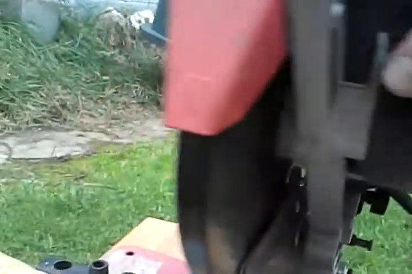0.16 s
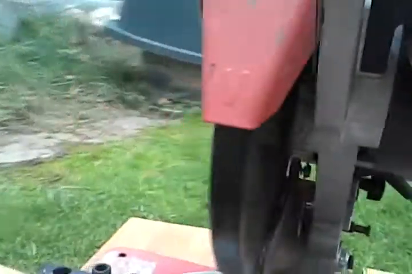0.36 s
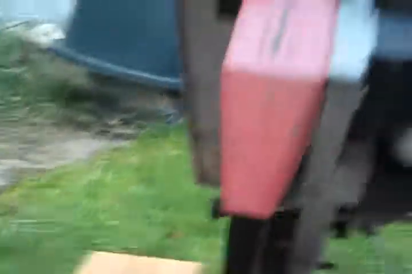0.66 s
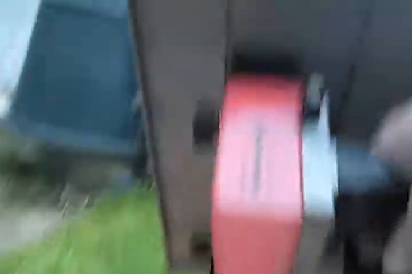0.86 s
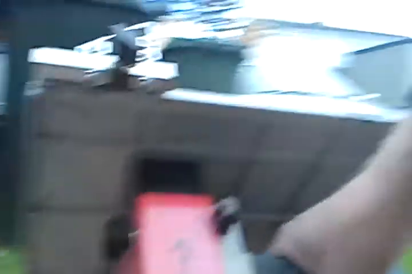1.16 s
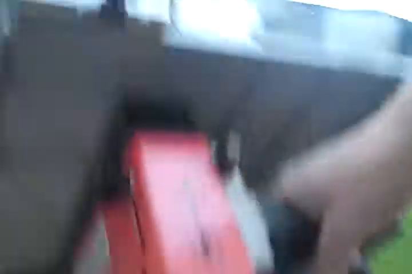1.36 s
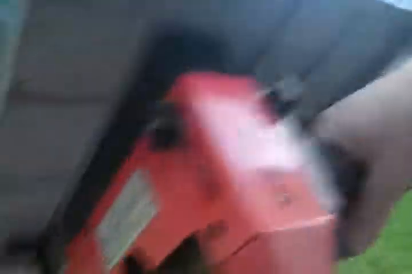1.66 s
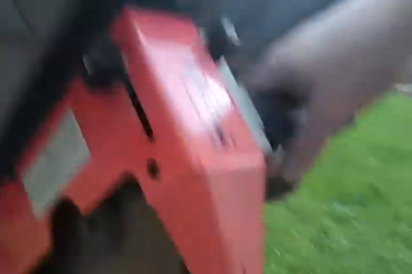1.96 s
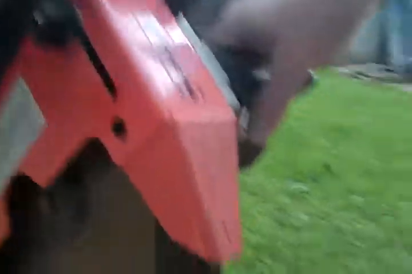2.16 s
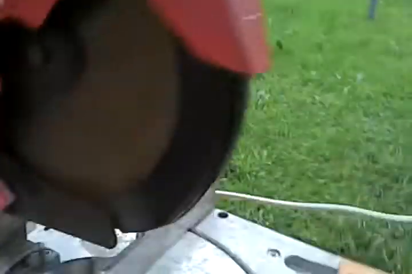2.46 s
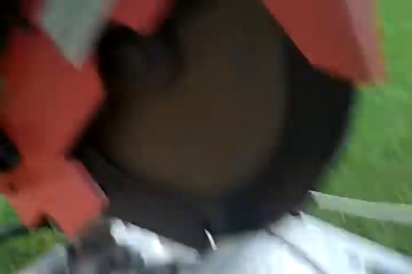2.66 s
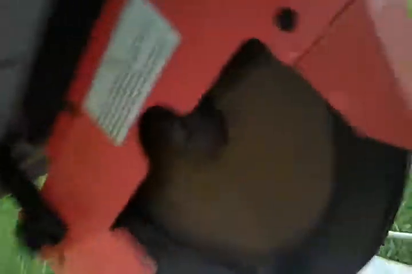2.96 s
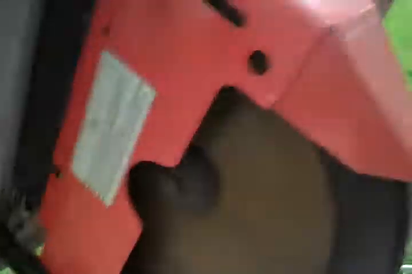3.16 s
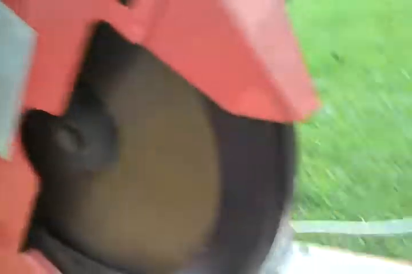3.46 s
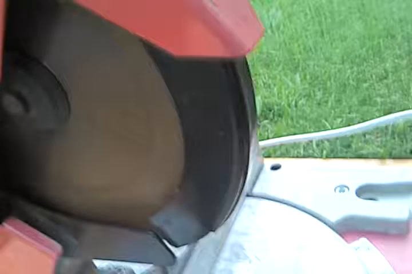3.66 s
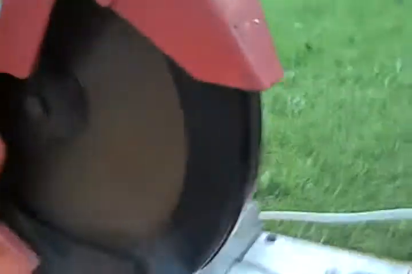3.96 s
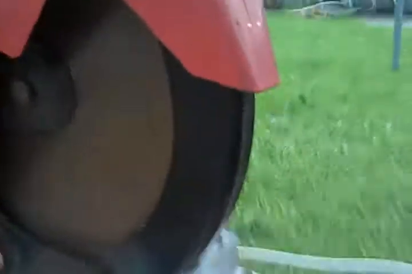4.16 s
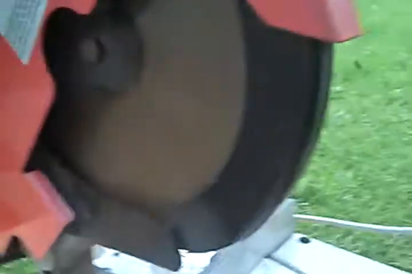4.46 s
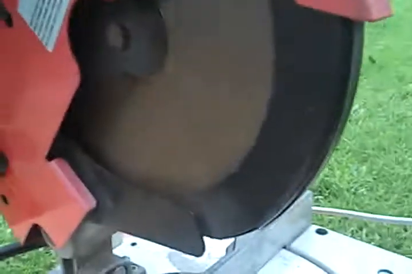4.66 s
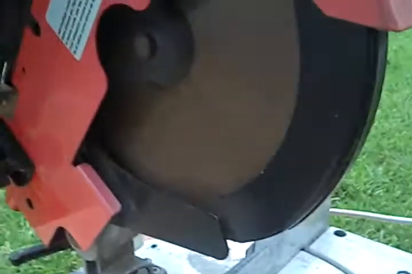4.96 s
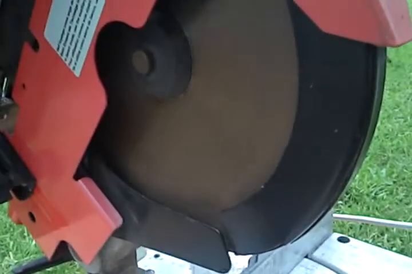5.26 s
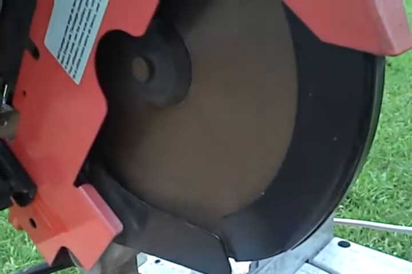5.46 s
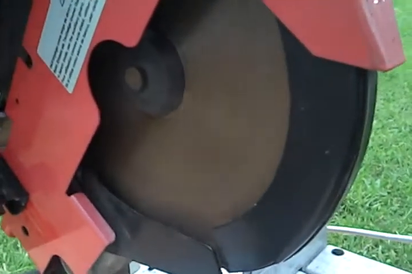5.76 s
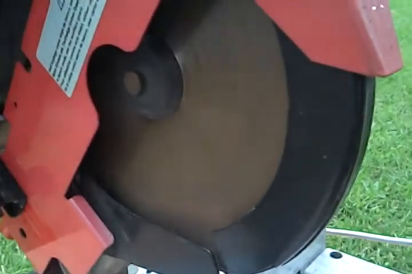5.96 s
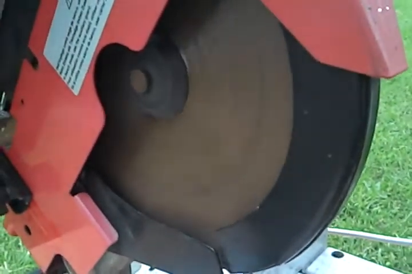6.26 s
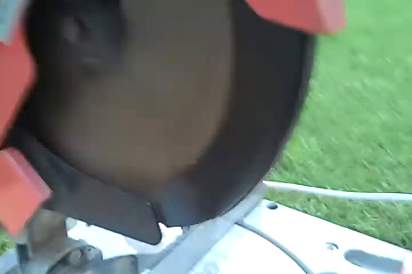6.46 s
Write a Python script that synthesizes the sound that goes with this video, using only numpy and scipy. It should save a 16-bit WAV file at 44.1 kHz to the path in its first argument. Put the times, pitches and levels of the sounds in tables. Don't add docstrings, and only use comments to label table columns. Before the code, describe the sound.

Close outdoor stereo sound of a saw coasting after switch-off. It begins loud, with a bright, gritty metallic clatter pulsing over twenty times a second, mixed with airy fan noise and descending gear and motor tones. The movement around it changes the colour and favours the right side. The pulsing flattens and slows, the pitch slides down, the rattle dies, and lumpy wind rumbles mostly on the left.

```python
import sys
import numpy as np
from scipy import signal
from scipy.fft import rfft, irfft, next_fast_len
from scipy.io import wavfile
from scipy.ndimage import uniform_filter1d

SR = 44100
rng = np.random.default_rng(int(sys.argv[2]) if len(sys.argv) > 2 else 0)


def voltage_ratio(decibels):
    exponent = np.asarray(decibels, float) / 20
    return 10 ** exponent


def unload_audio(sound):
    columns = np.transpose(np.atleast_2d(sound))
    steps = np.round(np.clip(columns, -1, 1) * 32767)
    wavfile.write(sys.argv[1], SR, steps.astype(np.int16))


N = 291060
PAD = next_fast_len(N + 8192)
FREQ = np.arange(PAD // 2 + 1) * SR / PAD + 1e-3
TIME = np.arange(N) / SR


def curves(table):
    seconds, *columns = np.transpose(table)
    return [np.interp(TIME, seconds, column) for column in columns]


def colour(points):
    hz, db = np.transpose(points)
    return voltage_ratio(np.interp(np.log(FREQ), np.log(hz), db))


def unit(gain, band):
    shaped = gain * band
    return shaped / np.sqrt(np.mean(np.abs(shaped) ** 2))


def walk(rate):
    hold = max(int(SR / rate), 1)
    steps = np.repeat(rng.standard_normal(N // hold + 1), hold)
    return 1.36 * uniform_filter1d(uniform_filter1d(steps, hold), hold)[:N]


def late(x, ms):
    lag = np.round(ms * SR / 1000).astype(int)
    return x[np.clip(np.arange(N) - lag, 0, N - 1)]


def causal(gain):
    cepstrum = irfft(np.log(gain), PAD)
    cepstrum[1:PAD // 2] *= 2
    cepstrum[PAD // 2 + 1:] = 0
    return np.exp(1j * rfft(cepstrum).imag)


# time in seconds, gear teeth meeting per second in Hz.
COASTING = [(0, 1112), (1, 933), (2, 762), (3, 605), (4, 453), (5, 309), (6, 155), (6.6, 83)]
# time in seconds, lead in wheel turns.
WALK_ROUND = [(0, -.02), (.15, .16), (.5, .06), (1.05, -.03), (1.22, -.25), (1.4, -.23), (1.7, .08),
              (2.1, .08), (3.8, -.3)]


def turn():
    teeth_per_turn, start_turns = 41.5, 0.28
    teeth = np.cumsum(curves(COASTING)[0]) / SR
    return (teeth / teeth_per_turn + curves(WALK_ROUND)[0] + start_turns) % 1


# pitch in Hz, width in Hz, level in dB.
BODY_RINGS = [
    [(583, 143, -2), (1003, 22, -5), (1985, 26, -3.5), (2380, 44, -18), (3160, 210, -6), (4300, 120, 1.5),
     (4840, 550, -0.5), (6100, 68, -22), (6493, 110, -5.5), (7760, 204, -15), (8800, 154, -27)],
    [(910, 140, -8), (2415, 49, 8), (3400, 435, -1), (3300, 14.5, -1), (3590, 35, 4.5), (4680, 110, -11),
     (5830, 14, -12), (6530, 40, 0), (7100, 110, -13), (6930, 43, 3), (7500, 110, -5), (8420, 88, -8)],
    [(591, 88, -8), (968, 34, -8), (1870, 35, -60), (2558, 48, 2.5), (3500, 30, -1.5), (4070, 46, -6),
     (4400, 30, -23), (4724, 64, -3.5), (6670, 64, -5.5), (7380, 70, -9), (8010, 330, -14),
     (8900, 120, -14)],
]
# frequency in Hz, level in dB per Hz.
BODY_BROAD = [
    [(150, -59), (250, -23), (795, -41), (995, -6.5), (1640, -8), (2480, -4), (2750, -12), (4950, -2),
     (5880, -10.5), (11100, -19), (15500, -18)],
    [(150, -60), (250, -9.5), (1310, -2), (1530, -15), (2090, 2), (3110, 2), (3890, -17), (4700, 12.5),
     (5130, 1.5), (7620, -15), (15500, -21)],
    [(150, -58), (250, -56), (961, -2.5), (1080, -13), (1760, -2), (4170, -10.5), (4870, 2), (7760, -25.5),
     (10200, -19.5), (14700, -21.5), (15500, -55)],
]
RING_OVER_BROAD_DB = [4.5, 4.5, 8.5]


def body(view, shade_hz=30000):
    rings = 0
    for hz, width, db in BODY_RINGS[view]:
        rings = rings + voltage_ratio(db) ** 2 / (1 + ((FREQ - hz * hz / FREQ) / width) ** 2)
    rings = rings / (1 + (FREQ / shade_hz) ** 8)
    return np.sqrt(rings * voltage_ratio(RING_OVER_BROAD_DB[view]) ** 2 + colour(BODY_BROAD[view]) ** 2)


# frequency in Hz, level in dB.
LEFT_SHADE = [
    [(60, 0.5), (110, -1.0), (200, -3), (380, -3), (700, -2.5), (1290, -3), (2380, 22.5), (4400, -14),
     (8120, -24), (15000, -26)],
    [(60, -1.5), (110, -3.5), (200, -19), (380, 1), (700, 1.5), (1290, -6), (2380, -24), (4400, -9),
     (8120, 12), (15000, 13)],
    [(60, 0.0), (110, -2.0), (200, -19), (380, 4), (700, 2.5), (1290, 9.5), (2380, -1.5), (4400, -19.5),
     (8120, -10), (15000, -22.5)],
]
# time in seconds, gear rattle at the right microphone in dB, wrist turn toward the left one in dB.
GEAR_AND_WRIST = [(0, -8.5, 0.5), (.17, -13.5, 0.5), (.7, -17, 1.5), (1.05, -20, 1), (1.36, -19, 2.5),
                  (1.63, -13, 1.5), (2.04, -14, 1.5), (2.38, -15.5, 1.5), (2.7, -13, 1.5),
                  (3.06, -13.5, 3.5), (3.3, -15.5, 1), (3.9, -17.5, 4.5), (4.7, -20, -0.5), (5.1, -24, 2.5),
                  (5.6, -27.5, 3), (5.95, -35, 4.5), (6.4, -44, 6), (6.6, -50.5, 5.5)]
# time in seconds, viewpoint (0 motor end, 1 top, 2 wheel side), throb depth in dB, left lag in ms.
VIEWPOINT = [(0, 0.023, 15, 0.11), (.5, 0.14, 15.6, 0.09), (1.0, 0.37, 13, 0.16), (1.5, 0.77, 14, 0.19),
             (1.7, 1.03, 9.3, 0.2), (2.2, 1.49, 7.6, 0.29), (2.6, 1.61, 3.9, 0.34), (3.1, 1.76, 5.6, 0.33),
             (3.4, 2.02, 2.6, 0.35), (4.5, 1.66, 1, 0.28), (6.6, 1.76, 0.81, 0.25)]
# low edge in Hz, high edge in Hz, share of the throb, likeness of the two
# microphones from 0 to 1, share of the lag, graininess in dB, flicker in dB, level in dB.
SAW_PARTS = [
    (3530, 8060, 1.11, 0, 0.94, 1.33, 0.97, 0.84),
    (325, 1280, 0.15, 0.77, 0.6, -0.07, 1, 0.1),
    (1516, 3250, 0.63, 0.39, 0.96, 1.5, 1.24, 0.59),
    (7260, 16500, 0.098, 0, 0.98, -0.1, 0.63, 3),
]
# levels in dB at the three viewpoints, share of the rattle followed, dB per kHz of tooth pitch.
PART_LEVELS = [
    ([0, 0, 0], 1, 0),
    ([-14, -21, -20], .51, 0.72),
    ([6.4, 0.92, 0.1], 0.86, -9.5),
    ([-45.5, -37.5, -34], 0.46, 26.8),
]
# left minus right in dB at the three viewpoints, share of the wrist turn.
PART_SIDES = [
    ([-8.5, -12, -9.5], 0.1),
    ([0.82, -3.5, -2.3], 0.45),
    ([-3.5, -7.5, -4.25], 1.6),
    ([-5, -26, -5], 0.16),
]


def rattle():
    rise_turns, arc_turns = 0.23, 0.71
    gear_db, wrist_db = curves(GEAR_AND_WRIST)
    view, depth_db, lag_ms = curves(VIEWPOINT)
    mesh_khz = curves(COASTING)[0] / 1000
    angle = turn()
    bite = np.clip(angle / rise_turns, 0, 1)
    easing = np.cos(np.pi / 2 * np.clip(angle / arc_turns, 0, 1)) ** 2
    throb = bite * easing
    bodies = [body(v) for v in range(3)]
    shaded = [body(v, shade_hz=5300) * colour(LEFT_SHADE[v]) for v in range(3)]
    left = right = 0
    for part, (seen_db, follow, slope), (side_db, wrist_share) in zip(SAW_PARTS, PART_LEVELS, PART_SIDES):
        low_hz, high_hz, share, alike, lag, grain_db, flicker_db, part_db = part
        level_db = np.interp(view, range(3), seen_db) + follow * gear_db + slope * mesh_khz
        pan_db = np.interp(view, range(3), side_db) + wrist_share * wrist_db
        band = 1 / np.sqrt((1 + (low_hz / FREQ) ** 12) * (1 + (FREQ / high_hz) ** 12))
        throb_db = share * depth_db * throb * (1 + 0.14 * walk(24.96))
        push = voltage_ratio(throb_db + grain_db * walk(300) + flicker_db * walk(21.956))
        push = push / np.sqrt(uniform_filter1d(push ** 2, SR // 5)) * voltage_ratio(level_db + part_db)
        near, other = rng.standard_normal((2, N))
        other = other - 0.67 * uniform_filter1d(other, size=11)
        far = np.sqrt(alike) * late(near, lag * lag_ms) + np.sqrt(1 - alike) * other
        far = far * voltage_ratio(pan_db)
        for v in range(3):
            facing = np.clip(1 - np.abs(view - v), 0, 1) * push
            right = right + rfft(near * facing, PAD) * unit(bodies[v], band)
            left = left + rfft(far * facing, PAD) * unit(shaded[v], band)
    return irfft(np.array([left, right]) * causal(sum(bodies)), PAD)[:, :N]


def housing(hz, rings):
    power = 0
    for ring_hz, width, db in rings:
        power = power + voltage_ratio(db) ** 2 / (1 + ((hz - ring_hz) / width) ** 2) ** 2
    return np.sqrt(power)


THIN_RING_HZ, THIN_RING_WIDTH_HZ, THIN_RING_DB = 3800, 90, -17
# pitch in Hz, width in Hz, level in dB.
LOW_HOUSING = [(365, 32, -11), (458, 27, -5), (531, 32, -3.5), (611, 23, 1), (716, 83, -7.5), (828, 19, -2),
               (982, 37, 6.5)]
LEFT_HOUSING = [(1220, 110, -7.5), (1490, 55, -5), (1700, 150, 0), (1930, 69, -3.7), (2300, 43, 2),
                (2810, 71, -5), (3260, 270, 0.62), (THIN_RING_HZ, THIN_RING_WIDTH_HZ, THIN_RING_DB)]
RIGHT_HOUSING = [(1050, 160, -11), (1610, 150, -14), (2080, 110, -7), (2530, 150, 3.5), (2970, 120, 0.5),
                 (3600, 110, -4), (4400, 120, -11)]
OCTAVE_HOUSING = [(1630, 130, -3), (2220, 130, -3), (3220, 130, 2), (4730, 170, 8), (5350, 200, 1)]
TONES_SEEN_DB = [-11.5, 0.5, 2]


def tones():
    fan_ratio, fan_fades_hz = 1.51, 900
    wobble, flutter_db = 0.008, 2.5
    hz = curves(COASTING)[0]
    phase = 2 * np.pi * np.cumsum(hz * (1 + wobble * walk(60))) / SR

    def tone(ratio, db):
        return np.sqrt(2) * voltage_ratio(flutter_db * walk(40)) * np.sin(ratio * phase) * voltage_ratio(db)

    mesh = tone(1, -23.5) * housing(hz, LOW_HOUSING)
    fan_hz = fan_ratio * hz
    fan = tone(fan_ratio, -24.5) * housing(fan_hz, LOW_HOUSING) / (1 + (fan_fades_hz / fan_hz) ** 4)
    whine = tone(4, -18.5)
    octave = tone(8, -24.5) * housing(8 * hz, OCTAVE_HOUSING)
    low = mesh + fan
    left = late(low + 0.29 * octave, 0.1) + late(whine * housing(4 * hz, LEFT_HOUSING), 0.27)
    right = low + octave + whine * housing(4 * hz, RIGHT_HOUSING)
    seen_db = np.interp(curves(VIEWPOINT)[0], range(3), TONES_SEEN_DB)
    return voltage_ratio(0.42 * curves(GEAR_AND_WRIST)[0] + seen_db) * np.array([left, right])


# time in seconds, level of the hum in dB.
HUM_LEVEL = [(0, -42.5), (.8, -46.5), (1.5, -46), (2.5, -49), (3.5, -48), (4.5, -49), (5.2, -48.5),
             (6.6, -53)]
# frequency in Hz, level in dB per Hz.
HUM_COLOUR = [(12, -44), (20, -5), (38, -14), (102, -10), (128, -5), (156, -11), (255, -9), (289, -14.5),
              (357, -15), (400, -11.5), (520, 2), (880, -120)]


def hum():
    noise = rfft(rng.standard_normal((2, N)), PAD)
    mid, side = irfft(noise * unit(colour(HUM_COLOUR), FREQ < 500), PAD)[:, :N]
    level = voltage_ratio(curves(HUM_LEVEL)[0] + 2.4 * walk(4.07))
    return level * np.array([mid + 0.12 * side, mid - 0.64 * side])


# time in seconds, level of the singing panel in dB.
PANEL_LEVEL = [(0, -70), (1.22, -57), (1.33, -21.5), (1.42, -19), (1.55, -26.5), (1.8, -20), (1.95, -55),
               (6.6, -82)]


def guard():
    panel_hz, width_hz, knock_turns = 2572, 23, 0.074
    knocks = rng.standard_normal(N) * np.exp(-turn() / knock_turns)
    panel = unit(1 / (1 + 1j * (FREQ - panel_hz ** 2 / FREQ) / width_hz), 1)
    sing = irfft(rfft(knocks / np.std(knocks), PAD) * panel, PAD)[:N]
    sing = sing * voltage_ratio(curves(PANEL_LEVEL)[0])
    return np.array([0.15 * late(sing, 0.13), sing])


# frequency in Hz, level in dB per Hz.
WIND_COLOUR = [(12, -40), (25, -4), (60, -1), (124, 2), (274, -5), (420, -18.5), (600, -21), (780, -54)]
# peak in seconds, half length in seconds, level in dB, left minus right in dB.
WIND_GUSTS = [(5.29, 0.096, -46, -4), (5.428, 0.045, -41.5, 23), (5.574, 0.028, -34, 16),
              (5.653, 0.018, -34, 16), (5.73, 0.038, -31, -3), (5.892, 0.034, -31, 19),
              (5.975, 0.029, -29.5, 23), (6.088, 0.055, -22, 7), (6.197, 0.033, -27, 1),
              (6.273, 0.055, -25, 23.5), (6.43, 0.043, -40, 0), (6.55, 0.11, -34.5, 20)]


def wind():
    lumps = voltage_ratio(np.array([2.5 * walk(70), 3.7 * walk(70)]))
    noise = rfft(rng.standard_normal((2, N)) * lumps, PAD)
    eddies = irfft(noise * unit(colour(WIND_COLOUR), FREQ < 800), PAD)[:, :N]
    gusts = 0
    for peak, half, db, pan_db in WIND_GUSTS:
        sides_db = np.array([[pan_db], [-pan_db]]) / 2
        gusts = gusts + np.exp(-((TIME - peak) / half) ** 2) * voltage_ratio(db - 6.5 + sides_db)
    return eddies * gusts


def scene():
    return rattle() + tones() + hum() + guard() + wind()


def top_cut(x):
    return signal.sosfilt(signal.butter(12, 15400, fs=SR, output="sos"), x)


def record(dry):
    knee, room = 0.6, 0.42
    over = np.maximum(np.abs(dry) - knee, 0)
    squeezed = np.sign(dry) * (np.minimum(np.abs(dry), knee) + room * np.tanh(over / room))
    return top_cut(squeezed)


dry = scene()
out = record(dry)
unload_audio(out)
```